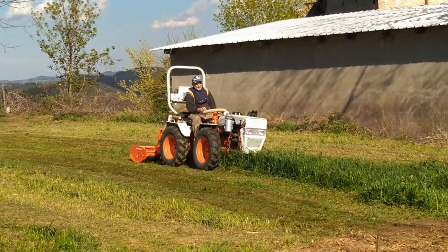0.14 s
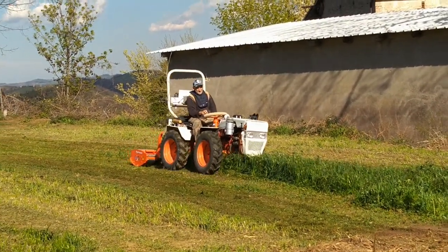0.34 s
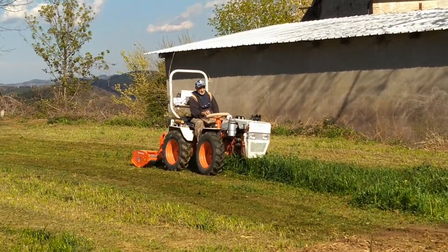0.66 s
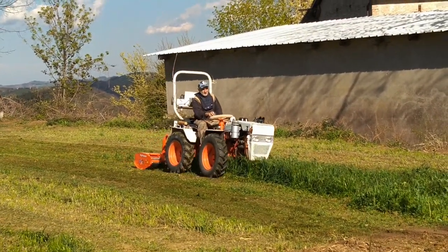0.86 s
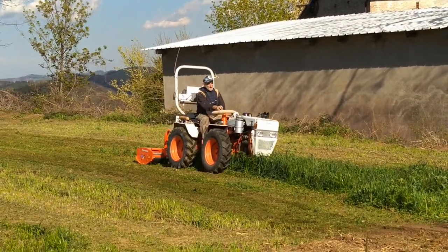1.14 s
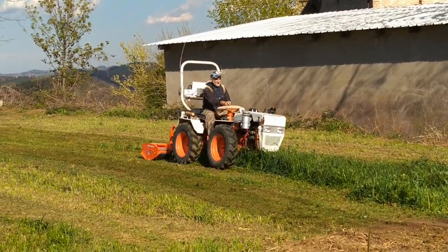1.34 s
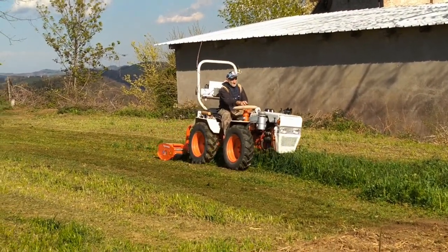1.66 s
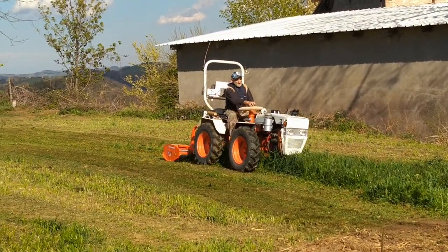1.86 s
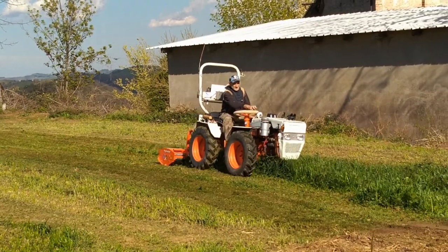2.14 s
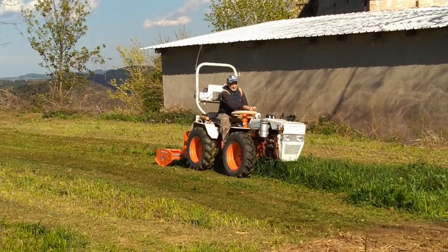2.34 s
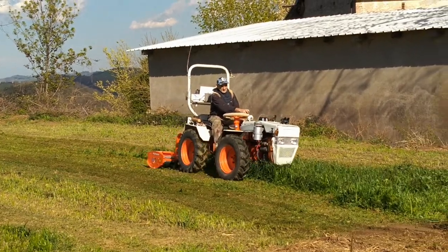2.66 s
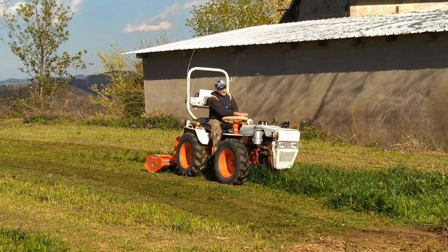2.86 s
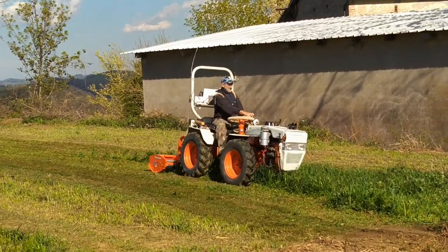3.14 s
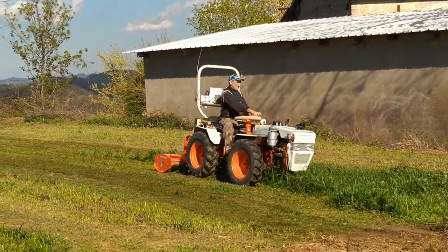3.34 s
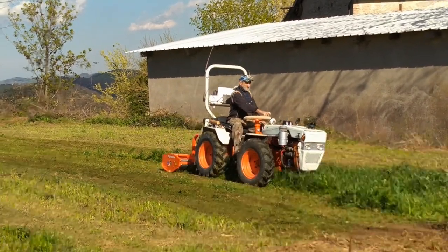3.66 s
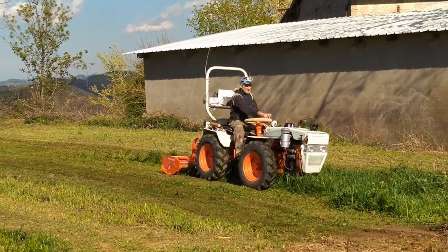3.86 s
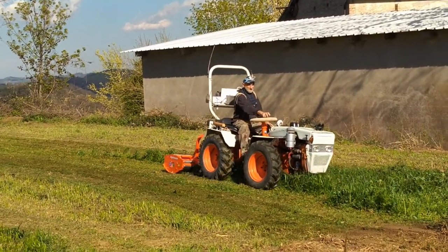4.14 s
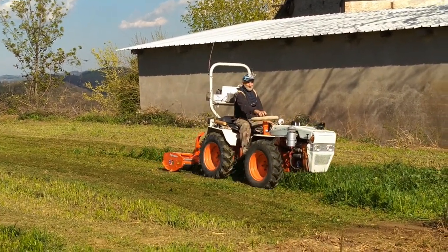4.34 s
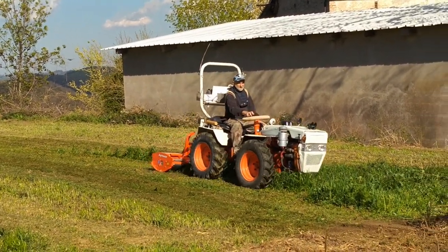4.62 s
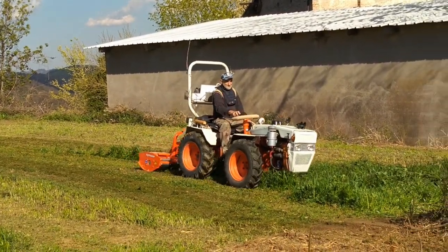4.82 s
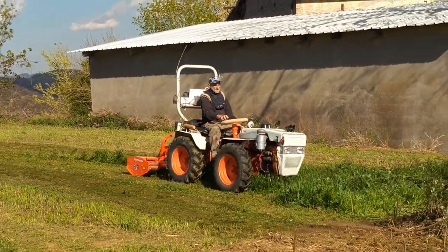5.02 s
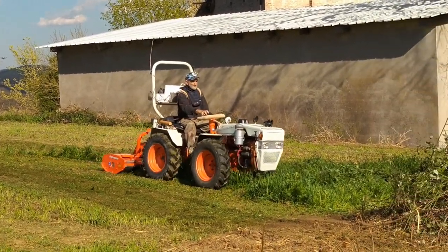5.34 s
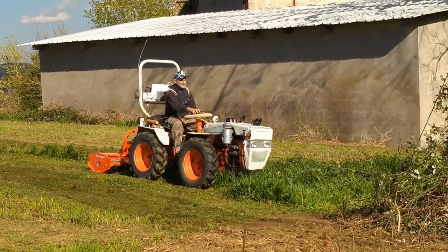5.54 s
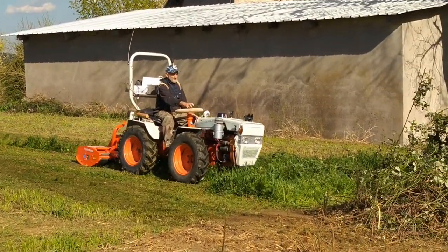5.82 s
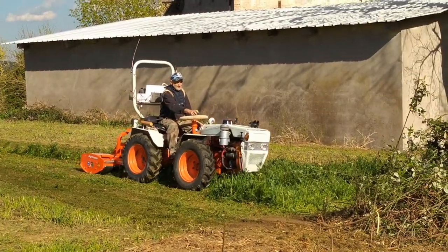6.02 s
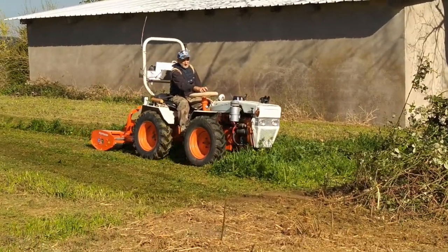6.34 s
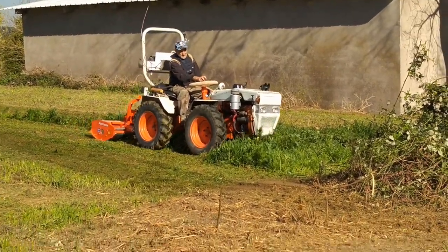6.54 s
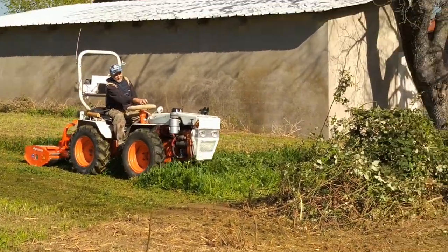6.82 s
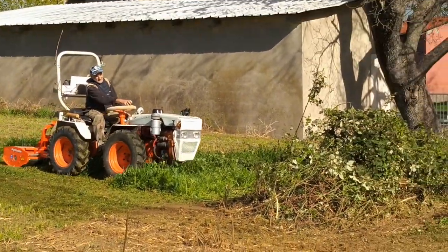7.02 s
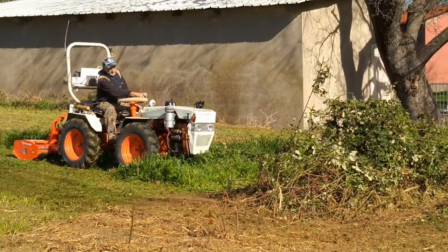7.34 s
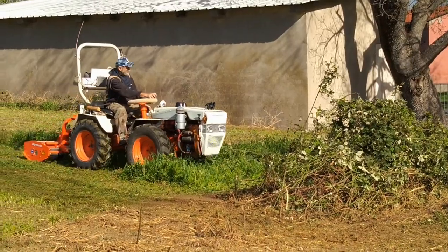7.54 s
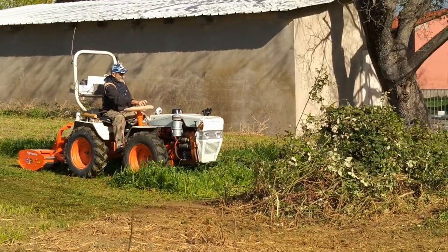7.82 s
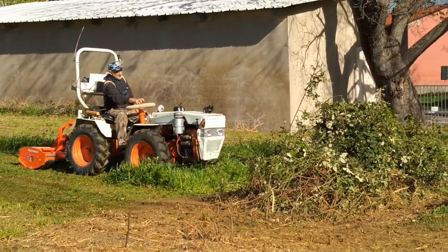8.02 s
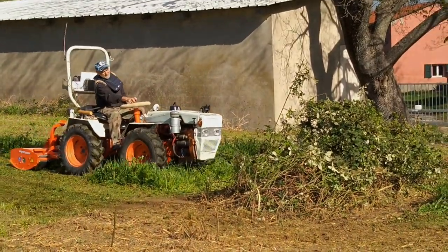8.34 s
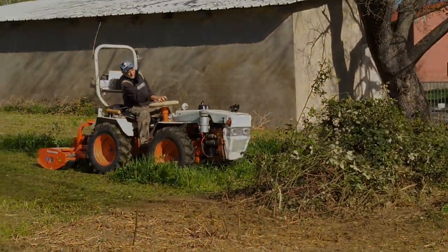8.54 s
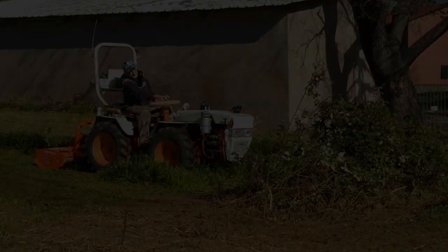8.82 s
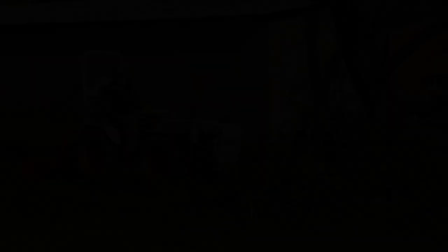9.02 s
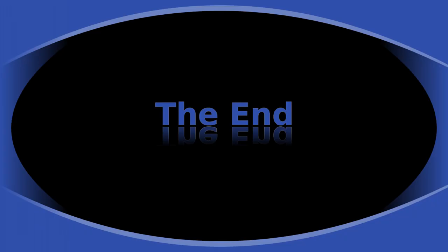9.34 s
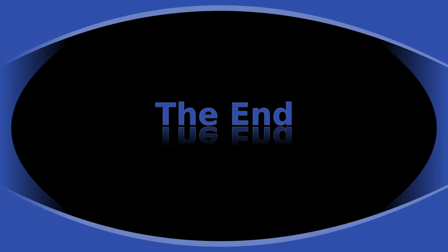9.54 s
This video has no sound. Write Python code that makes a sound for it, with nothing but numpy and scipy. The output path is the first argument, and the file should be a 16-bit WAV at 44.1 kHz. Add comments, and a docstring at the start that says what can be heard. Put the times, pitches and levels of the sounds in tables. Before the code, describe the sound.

Outdoors beside a barn wall, a small four-cylinder diesel tractor mows grass some metres from a stereo microphone pair. Its deep, fast throb carries knocking, metallic rattle, rotor hum and a high cutting hiss. Wind buffets and slaps the microphones strongly during the first two seconds, then only now and then. The machine grows brighter as it approaches, then everything stops dead just after nine seconds.

```python
"""First you hear the deep throb of a small four-cylinder diesel tractor, with wind blustering over it.
It mows grass beside a barn wall, some metres from a pair of microphones. Exhaust, fan and rotor are tones in
step with the engine; thud, knock, rattle and hiss are noise in bursts at the firings, and metal parts ring.
Gusts are noise that differs at the two microphones. Loud moments are turned down, then the sound is cut off."""
import sys
import numpy as np
from scipy import signal
from scipy.fft import rfft, irfft, next_fast_len
from scipy.io import wavfile
from scipy.ndimage import uniform_filter1d, map_coordinates

SR = 44100
rng = np.random.default_rng(int(sys.argv[2]) if len(sys.argv) > 2 else 0)


def transcribe(u):
    """Save the signal u as a 16-bit wav file named by the first command-line argument.

    u: samples, shape (n,) or (channels, n), limited to [-1, 1]; the rate is SR.
    q: integer samples, one column per channel.
    """
    v = np.clip(np.atleast_2d(u).T, -1, 1)
    q = np.round(v * 32767).astype(np.int16)
    wavfile.write(sys.argv[1], SR, q)


N = 426447  # length in samples


def gain_of(db):
    """Turns dB into a factor for the sound pressure."""
    return 10 ** (np.asarray(db) / 20)


def sides(db, pan_db):
    """Gains of left and right that differ by pan_db around a middle of db."""
    return gain_of(db + np.array([[.5], [-.5]]) * pan_db)


def evened(x):
    """Scales a sound to an rms of 1."""
    return x / np.sqrt(np.mean(x ** 2) + 1e-20)


def read(points, hz):
    """Reads a spectrum table between its points, on a log-frequency axis."""
    f, value = np.transpose(points)
    return np.interp(np.log(hz + 1), np.log(f + 1), value)


def curve(rows, column):
    """One column of a table in time, at every sample."""
    return np.interp(np.arange(N) / SR, np.array(rows)[:, 0], np.array(rows)[:, column])


def shaped(x, gain):
    """Filters a sound by a gain that is a function of Hz."""
    size = next_fast_len(N)
    return irfft(rfft(x, size) * gain(np.fft.rfftfreq(size, 1 / SR)), size)[..., :N]


def coloured(x, colour):
    """Gives noise the colour of a spectrum table and an rms of 1."""
    return evened(shaped(x, lambda f: gain_of(read(colour, f))))


def wander(hz):
    """Slow chance drift of rms 1, up to about hz."""
    steps = N // 200 + 2
    step_hz = np.fft.rfftfreq(steps, 200 / SR)
    slow = irfft(rfft(rng.standard_normal(steps)) * np.exp(-(step_hz / hz) ** 2), steps)
    return np.interp(np.arange(N), np.linspace(0, N, steps), evened(slow))


def tractor():
    """All parts of the machine share one engine turn; they reach the microphones together."""
    turns = engine_turns()
    tonal = exhaust_and_shake(turns) + rotor_and_fan(turns) + rings(turns)
    noise = rumble() + block(turns) + rattle(turns) + hiss(turns)
    return turning(ports(tonal + noise[0], noise[1]))


# engine speed: (t/s, four-stroke cycles per s)
SPEED = [(0.0, 18.22), (0.4, 18.28), (0.6, 18.52), (1.8, 18.57), (2.0, 18.79), (2.4, 18.84), (3.0, 18.66),
         (3.2, 18.26), (3.6, 18.65), (4.2, 18.55), (4.6, 18.14), (5.0, 18.15), (5.4, 18.37), (6.0, 18.12),
         (6.6, 18.65), (7.2, 17.67), (8.2, 18.2), (8.8, 18.81), (9.25, 18.4)]
FIRST_TURN = -.1  # cycles from the joint pressure dip of the tones at the start


def engine_turns():
    """Adds up the speed to count engine cycles; one cycle holds four firings."""
    return FIRST_TURN + 1 + np.cumsum(curve(SPEED, 1)) / SR  # the 1 keeps the count above zero


# brightness of the machine, rising overall as it draws nearer: (t/s, level/dB before a layer's own factor)
BRIGHTNESS = [(0.0, -2), (0.7, -3), (0.95, 1.5), (1.06, -8), (1.2, -0.5), (1.7, -4), (2.2, -1.5),
              (2.84, -2), (3.25, -4), (3.43, 1.5), (3.55, -2.5), (4.6, -1.5), (5.6, 2), (7.4, 2),
              (8.0, 6.5), (8.17, 1.5), (8.3, 9.5), (8.36, 5.5), (9.2, 4.5)]


def follow(base_db, db_per_db):
    """Gain of a layer: a base level plus its own share of the brightness."""
    return gain_of(base_db + db_per_db * curve(BRIGHTNESS, 1))


def tones(turns, orders, waver_db):
    """Multiples of one shaft, all in step, so that they join in one dip of pressure a turn."""
    out = np.zeros(N)
    for multiple, db in orders:
        gain = np.sqrt(2) * gain_of(db + waver_db * wander(3.1))
        out -= gain * np.cos(2 * np.pi * multiple * turns)
    return out


# exhaust throb: (multiple of the cycle rate, level/dB before the layer gain)
EXHAUST = [(4, -25.5), (5, -30), (7, -24.5), (9, -34), (10, -39.5), (11, -34), (12, -34.5), (13, -35.5),
           (15, -42), (16, -44.5), (17, -46), (19, -53), (21, -55), (27, -58), (28, -60)]
# shake of the block, pushing when the exhaust dips: (multiple of the cycle rate, level/dB before the layer gain)
SHAKE = [(3, -39), (6, -47), (8, -36.5), (14, -51), (18, -53), (25, -60)]


def exhaust_and_shake(turns):
    """Exhaust pulses and the opposite push of the shaking block, as tones locked to the engine cycle."""
    return follow(-2.25, -.05) * (tones(turns, EXHAUST, 0.88) - tones(turns, SHAKE, 1.5))


ROTOR_RATIO, FAN_RATIO = 2.1, 11.87  # mower rotor turns and fan blade passes per engine cycle
# mower rotor: (multiple of rotor speed, level/dB)
ROTOR = [(4, -31), (5, -42), (8, -44.5), (12, -60)]
# cooling fan: (multiple of blade rate, level/dB)
FAN = [(1, -40.5), (2, -56), (3, -57), (4, -52.5)]


def rotor_and_fan(turns):
    """Spinning rotor and passing fan blades hum at fixed ratios to the engine."""
    return tones(ROTOR_RATIO * turns, ROTOR, 2.0) + tones(FAN_RATIO * turns, FAN, 1.8)


def clatter(turns, colour, firings_db, repeat, depth, ring, uneven_db):
    """Noise bursts at each firing; a share repeats from cycle to cycle, as the same parts strike alike.

    repeat: repeating share of the power; depth: share in bursts; ring: fade time in firings.
    """
    firing = 4 * turns
    index = np.floor(firing).astype(int)
    strength = gain_of(np.array(firings_db)[index % 4] + uneven_db * rng.standard_normal(1000)[index])
    burst = 1 - depth + depth * uniform_filter1d(strength * np.exp(-(firing % 1) / ring), 40)
    # eight noise patterns, each one cycle long in 2400 steps
    patterns = irfft(np.exp(2j * np.pi * rng.random((8, 2, 1201)))) * np.sqrt(2400)
    age = np.arange(N) / SR / 1.8  # a new pattern every 1.8 s, as the tractor moves on
    now = age.astype(int)
    blend = np.pi / 2 * (age % 1)
    angle = (turns % 1 * 2400).astype(int)
    same = np.cos(blend) * patterns[now, :, angle].T + np.sin(blend) * patterns[now + 1, :, angle].T
    fresh = rng.standard_normal((2, N))
    return coloured(burst * (np.sqrt(repeat) * same + np.sqrt(1 - repeat) * fresh), colour)


# oil pan and covers: (f/Hz, relative level/dB per Hz)
THUD = [(330, -15), (500, -17.5), (540, -13), (633, -2), (684, -10), (730, -1.5), (860, -2), (960, -9),
        (1130, -7.5), (1280, -11), (1500, -21), (2500, -100)]
# engine block: (f/Hz, relative level/dB per Hz)
KNOCK = [(700, -100), (1200, -25.5), (1330, -14), (1420, -6.5), (1560, -2.5), (1760, 0), (1900, -4.5),
         (2040, -14.5), (2240, -3.5), (2450, -4.5), (2600, -4.5), (2750, -15), (3300, -52.5), (5000, -110)]
# strength of the four firings: (level/dB for each)
THUD_FIRINGS = [-1, 2.5, 0, 0]
KNOCK_FIRINGS = [1, -1.5, -2.5, 3]


def block(turns):
    """Each firing jolts the oil pan and covers into a dull thud and the block into a knock."""
    thud = clatter(turns + .015, THUD, THUD_FIRINGS, repeat=.55, depth=.35, ring=0.46, uneven_db=1.1)
    knock = clatter(turns + .01, KNOCK, KNOCK_FIRINGS, repeat=.6, depth=.55, ring=0.81, uneven_db=1.0)
    return follow(-33, 0.25) * (gain_of(-6.0) * thud + knock)


# valves, injectors, panels: (f/Hz, relative level/dB per Hz)
RATTLE = [(1620, -35.5), (2750, -11.5), (3120, 1.5), (3460, -4), (3640, -3), (4060, -0.5), (4460, 1),
          (5450, -0.5), (6130, -2), (7500, -13), (9750, -35.5), (16500, -120)]


def rattle(turns):
    """Valves, injectors and panels clatter at each firing."""
    firings_db = [2, -1.5, 1.5, -1]
    noise = clatter(turns + .03, RATTLE, firings_db, repeat=.4, depth=.65, ring=0.67, uneven_db=1.66)
    return follow(-35.5, 0.38) * noise


# flails cutting air and grass: (f/Hz, relative level/dB per Hz)
HISS = [(4410, -27.5), (7500, 0), (8750, -4), (10400, 0), (12000, -1.5), (13400, -4), (15500, -15.5)]


def hiss(turns):
    """Flails cut air and grass with a high hiss that swells at each firing."""
    firings_db = [-3, -1, 3.5, 0]
    noise = clatter(turns + 0.028, HISS, firings_db, repeat=.1, depth=.5, ring=1.0, uneven_db=2.2)
    return follow(-45.5, 0.87) * noise


RING_UNEVEN_DB, RING_WAVER_DB, RING_JITTER_S = 1.5, 2.5, .00003
REBOUND_S, REBOUND_DB = .0135, -5  # a lighter blow follows about one firing later
# metal parts struck once a cycle, each heard best while its side faces the microphones:
# (f/Hz, width/Hz, level/dB at its loudest, place in the cycle 0-1, loudest at t/s, span/s)
RINGS = [(638, 18, -54, .2, 5.8, 6.6), (857, 14, -53, .45, 5.5, 5), (1136, 20, -59, .2, 11, 5.7),
         (1381.5, 20, -50.5, .05, 6.3, 5), (1440, 20, -42, 0.8, 8.8, 1.7), (1550, 12, -49.5, .8, 2, 6),
         (1651, 27, -43, .74, 5.5, 7.6), (1735, 20, -49, .78, 4.4, 6.6), (1876, 18, -49, 0.06, 6.8, 3),
         (2235, 36, -52.5, .5, 3.7, 3.3), (3140, 90, -54, 0.95, 6.6, 3.5), (3750, 60, -58.5, .5, 9.8, 1.5),
         (4430, 110, -46, 0.4, 1, 1.8), (4590, 130, -41.5, 0.4, 8.6, 1.3), (5300, 60, -50, 0.89, 3.5, 1.7),
         (5620, 80, -52.5, 0, 9.3, 2.2), (5950, 70, -48, 0.7, 4.4, 1.1), (6450, 80, -51, 1, 8.7, 1)]


def rings(turns):
    """A blow and a rebound each cycle on every part, a little uneven, left to ring at the part's own pitch."""
    t, out = np.arange(N) / SR, np.zeros(N)
    for hz, width, db, place, loudest_s, span_s in RINGS:
        at = np.flatnonzero(np.diff(np.floor(turns - place)))
        size, late = rng.standard_normal((2, 400))[:, :len(at)]
        struck = np.clip(at + np.round(RING_JITTER_S * SR * late).astype(int), 0, N - 1)
        blows = np.zeros(N)
        blows[struck] = gain_of(RING_UNEVEN_DB * size)
        blows += gain_of(REBOUND_DB) * np.roll(blows, round(REBOUND_S * SR))
        ring = signal.lfilter([1], [1, -np.exp((2j * hz - width) * np.pi / SR)], blows).imag
        facing = np.exp(-.5 * ((t - loudest_s) / span_s) ** 2)
        out += facing * gain_of(db + RING_WAVER_DB * wander(1.0)) * evened(ring)
    return out


# low rumble of the machine: (f/Hz, relative level/dB per Hz)
RUMBLE = [(25, -33), (55, -15.5), (110, -3), (200, -1), (330, -6.5), (500, -13), (800, -38), (1500, -110)]


def rumble():
    """Steady low noise under the throb."""
    return gain_of(-39) * coloured(rng.standard_normal((2, N)), RUMBLE)


# the body around the microphones shades them: (f/Hz, left minus right level/dB)
SHADE = [(60, -0.5), (400, -0.5), (900, 2), (1300, 0.5), (1650, 6), (2050, -2), (2500, 4.5), (3100, -10),
         (3550, -8), (3850, -1), (4200, -1), (5000, -2), (6000, -17), (6700, -9), (7300, -1.5),
         (8800, -9.5), (9200, 5.5), (10600, -1), (12000, -1.5), (13000, 0)]
# head start of the left microphone: (f/Hz, lead/radians before the added delay)
LEAD = [(60, 0), (250, .15), (450, 0), (750, .15), (1200, -.2), (1400, .2), (1900, -1), (2100, -.5),
        (2400, -.8), (2750, -3.1), (3000, -7), (3350, -9.3), (3700, -11.9), (3900, -10.2), (4500, -12.3),
        (4900, -12.4), (5300, -13.5), (5900, -13.5), (6500, -15.7), (7400, -16.4), (8200, -16),
        (9000, -18.9)]
# how alike the two microphones hear: (f/Hz, likeness 0-1)
LIKENESS = [(100, .99), (900, .98), (1250, .92), (1600, .98), (2050, .85), (2500, .92), (3500, .72),
            (4500, .85), (5500, .82), (6500, .6), (7100, .72), (8500, .35), (15000, .35)]


def ports(direct, diffuse):
    """Left and right: the direct sound with shading and lead, and a share thrown back by wall and ground."""
    size = next_fast_len(N)
    hz = np.fft.rfftfreq(size, 1 / SR)
    like = read(LIKENESS, hz)
    lean = np.tanh(read(SHADE, hz) * np.log(10) / 40)  # splits the dB difference between the sides
    a, b = rfft([direct, diffuse], size)
    left = (1 + lean) * np.exp(1j * read(LEAD, hz)) * a
    right = (1 - lean) * (like * a + np.sqrt(1 - like ** 2) * b)
    return irfft([left, right], size)[:, :N]


# the microphone pair turns: (t/s, added delay of the left/microseconds, share of the colour heard from aside)
AIM = [(0, 26, 0.4), (.8, 27, 0.019), (1.2, 17, 0.11), (3.2, 22, 0.18), (3.7, 4.7, 0.24), (4.8, 21, 0.58),
       (5.6, 27, 0.65), (6.6, 28, 0.72), (6.9, 67, 0.83), (8.2, 62, 0.85), (8.7, 25, 0.79), (9.3, 18, 0.82)]
# colour heard from aside: (f/Hz, change of level/dB at full share)
ASIDE = [(300, 1.5), (700, 2.5), (1100, 3), (1700, -1), (2100, -2), (2400, -8.5), (2750, 3.5), (3200, -1),
         (4600, -4), (5300, -0.5), (6000, -4), (6700, 3), (7500, -5.5), (9000, -2)]


def turning(ahead):
    """Turning the pair blends in the colour from aside and shifts the left microphone in time."""
    share = np.clip(curve(AIM, 2), 0, 1)
    left, right = (1 - share) * ahead + share * shaped(ahead, lambda f: gain_of(read(ASIDE, f)))
    late = np.arange(N) - curve(AIM, 1) * SR / 1e6
    return np.array([map_coordinates(left, [late], order=5, mode="nearest"), right])


GUST_RISE_S, GUST_FALL_S = 0.036, 0.078
FLAP_RISE_S, FLAP_FALL_S = 0.0058, 0.0071
CALM_DB, CALM_PAN_DB = -36.5, -1  # light breeze between gusts; left minus right
FLUTTER_IN_GUST_DB = -17.5  # steady flutter that rides on every gust
# gusts: (t/s, length/s, buffeting level/dB, left minus right level/dB)
WIND = [(0.0, 0.23, -23.5, -11.5), (.38, 0.2, -28.5, -18), (.68, 0.076, -19.5, -7), (.92, 0.37, -23, -12),
        (1.33, 0.12, -17, -2), (1.53, 0.57, -19, 5.5), (2.25, 0.24, -22.5, -4.5), (2.95, 0.16, -31.5, 2),
        (3.42, 0.045, -27.5, -7), (3.95, 0.13, -24, 6), (4.4, 0.27, -25, 3.5), (5.3, 0.25, -25, 0.5),
        (7.45, 0.37, -33, 2), (7.92, 0.55, -26.5, -11), (8.55, 0.26, -27.5, -2), (8.9, 0.3, -34, -4.5)]
# low colour of the buffeting: (f/Hz, relative level/dB per Hz)
BUFFET = [(20, -32.5), (33, -14), (48, 9.5), (110, 3.5), (200, -2.5), (300, -24.5), (450, -31), (900, -110)]
# bright flaps at the edge of the gusts: (t/s, length/s, level/dB, left minus right level/dB)
FLUTTER = [(0.0, 0.021, -34.5, -3), (.06, .12, -29.5, 6), (.235, 0.032, -33.5, -13), (.56, 0.02, -27, -9),
           (.742, 0.0046, -27, -11), (.965, 0.038, -26.5, -8), (1.04, 0.043, -25, 6),
           (1.11, 0.074, -28, -6), (1.18, .035, -50, -11), (1.27, .015, -40, -7),
           (1.34, 0.039, -20.5, 12.5), (1.37, .07, -23, -6.5), (1.43, 0.07, -25.5, 12),
           (1.54, 0.081, -26, 16), (1.615, 0.056, -23, 8), (1.72, 0.034, -24.5, 18),
           (1.79, 0.13, -31.5, 12), (1.975, 0.046, -25.5, 11), (2.065, 0.051, -32, 11),
           (2.335, 0.037, -31, 0), (2.595, .01, -41.5, -5), (3.965, 0.011, -36, -4), (4.415, .012, -32, 4),
           (4.465, .012, -44, 1), (5.32, 0.061, -43, 13.5), (5.52, 0.028, -31, 7), (7.65, 0.03, -28, 3),
           (7.935, 0.069, -38, 12), (8.125, 0.021, -28, -13), (8.19, 0.026, -31.5, 13),
           (8.305, 0.023, -35.5, -3.5), (8.6, 0.0086, -34.5, -10), (8.78, .015, -36, 10)]
# colour of the flutter: (f/Hz, relative level/dB per Hz)
FLAP = [(60, -60), (100, -22.5), (200, 1), (280, -0.5), (560, -12), (900, -26), (1300, -36.5), (2000, -72),
        (4000, -130)]


def wind():
    """Low buffeting over a light breeze, a brighter flutter in sudden flaps, and single slaps."""
    calm = sides(CALM_DB, CALM_PAN_DB) ** 2
    gust = swells(WIND, GUST_RISE_S, GUST_FALL_S)
    flaps = swells(FLUTTER, FLAP_RISE_S, FLAP_FALL_S) + gain_of(FLUTTER_IN_GUST_DB) ** 2 * gust
    return gusts(calm + gust, BUFFET, 2.8, 16.7) + gusts(flaps, FLAP, 1.7, 45) + pops()


def swells(rows, rise_s, fall_s):
    """Power on both sides of events that rise up to their start, hold for their length and die away."""
    t, power = np.arange(N) / SR, np.zeros((2, N))
    for s, length, db, pan_db in rows:
        near = slice(max(round((s - 6 * rise_s) * SR), 0), round((s + length + 6 * fall_s) * SR))
        edge = np.minimum(np.minimum((t[near] - s) / rise_s, (s + length - t[near]) / fall_s), 0)
        power[:, near] += (sides(db, pan_db) * np.exp(edge)) ** 2
    return power


def gusts(power, colour, lumps_db, lumps_hz):
    """Turbulent air as lumpy noise, unrelated at the two microphones."""
    lumps = gain_of([lumps_db * wander(lumps_hz) for side in "LR"])
    return np.sqrt(power) * coloured(lumps * rng.standard_normal((2, N)), colour)


POP_RISE_S, POP_FALL_S = .0012, 0.0029
# sharp slaps of air, mostly on one microphone: (t/s, peak level/dB, left minus right level/dB)
POPS = [(.065, -27, 15), (.255, -31, -10), (.515, -27, -12.5), (.565, -14.5, -9), (.738, -33.5, -14),
        (.965, -26, -12), (0.988, -31, -12), (1.032, -20, -12), (1.065, -30, 10), (1.18, -29, -17),
        (1.28, -35, -10), (1.347, -19, 16), (1.365, -25.5, -2), (1.485, -25, 15), (1.550, -27.5, 23),
        (1.591, -19, 22.5), (1.730, -21, 11), (1.775, -26.5, -12), (1.885, -31, 10), (1.979, -25, 12),
        (2.09, -31, 11), (4.418, -33, 3), (8.198, -28, 12)]


def pops():
    """Each slap of air is a short puff of noise between about 130 and 850 Hz."""
    out, t = np.zeros((2, N)), np.arange(1300) / SR
    shape = (1 - np.exp(-t / POP_RISE_S)) * np.exp(-t / POP_FALL_S)
    band = signal.butter(3, [130, 850], "band", fs=SR, output="sos")
    for s, db, pan_db in POPS:
        puff = shape * signal.sosfilt(band, rng.standard_normal((2, len(t))))
        puff = puff / abs(puff).max(1, keepdims=True) * sides(db, pan_db)
        start = round(s * SR)
        out[:, start:start + len(t)] += puff
    return out


def scene():
    """The tractor with the wind over it."""
    return tractor() + wind()


STOP_S, EDGE_HZ = 9.2443, 15700  # when the sound is cut off; upper limit of the treble


def record(dry):
    """Gain control turns loud moments down; then bass cut, overload, the sudden stop and the band limit."""
    power_db = 10 * np.log10(abs(uniform_filter1d((dry ** 2).mean(0), 1500)) + 1e-12)
    fall = np.arange(N) * 42.0 / SR  # the tracked level falls back by 42 dB a second
    tracked_db = np.maximum.accumulate(power_db + fall) - fall
    over_db = np.maximum(tracked_db + 20.5, 0)  # excess above -20.5 dB
    out = dry / gain_of(0.52 * uniform_filter1d(over_db, 400))
    out = shaped(out, lambda f: 1j * f / (1j * f + 25.0) * f ** 2 / (f ** 2 + 22.4 ** 2))  # bass cut
    out = .75 * np.tanh(out / .75)  # soft overload on peaks
    out = out * np.clip((STOP_S - np.arange(N) / SR) / 0.001, 0, 1)
    low_pass = signal.firwin(1023, EDGE_HZ, window=("kaiser", 9), fs=SR)
    return signal.oaconvolve(out, low_pass[None], "same")


dry = scene()
out = record(dry)
transcribe(out)
```